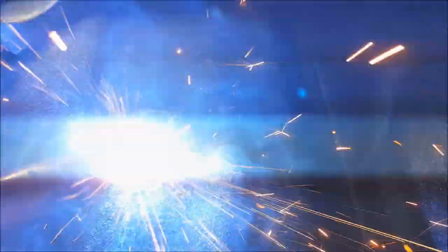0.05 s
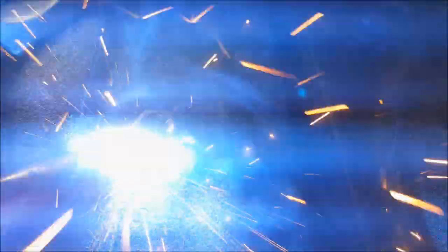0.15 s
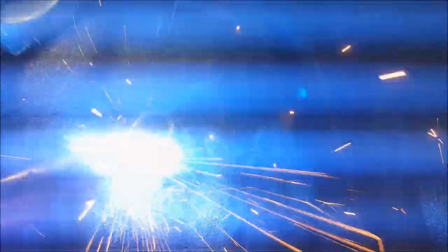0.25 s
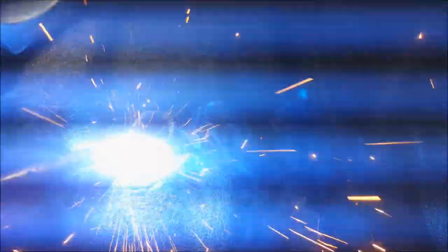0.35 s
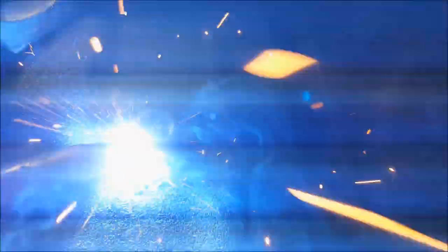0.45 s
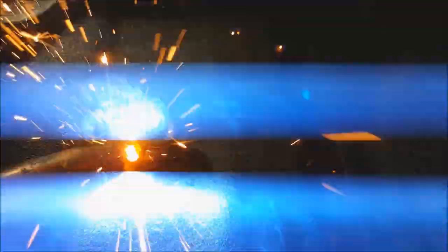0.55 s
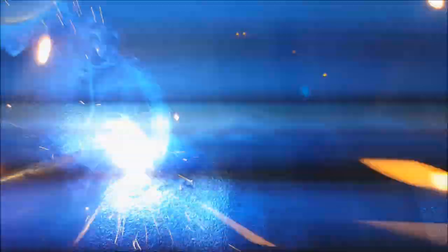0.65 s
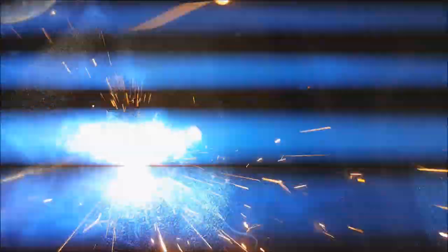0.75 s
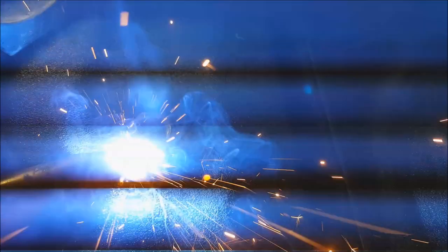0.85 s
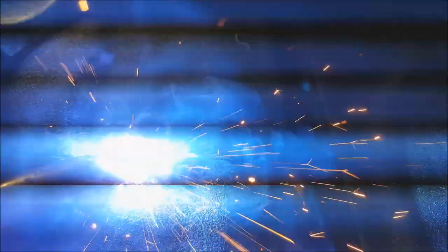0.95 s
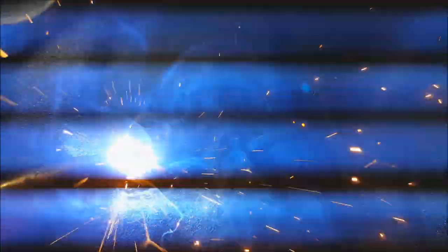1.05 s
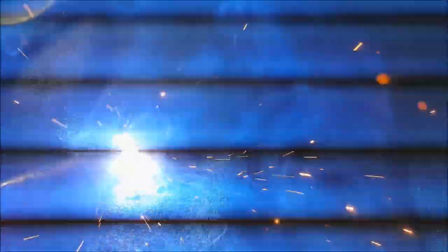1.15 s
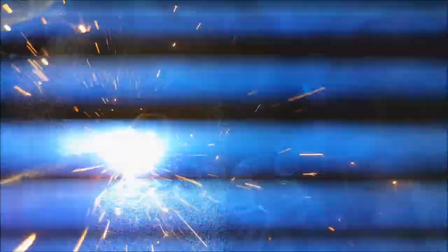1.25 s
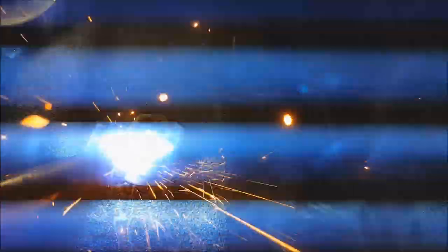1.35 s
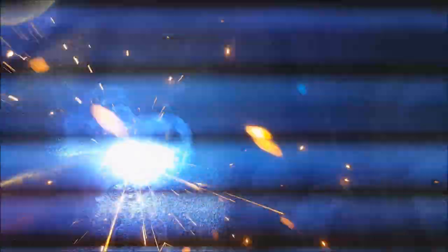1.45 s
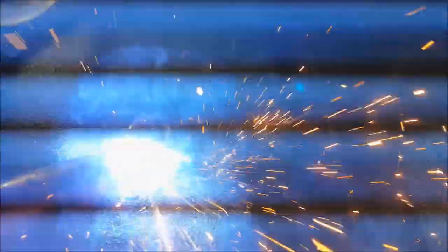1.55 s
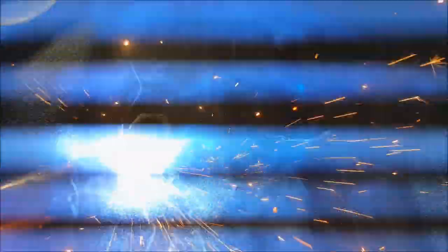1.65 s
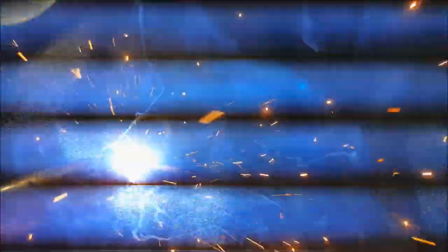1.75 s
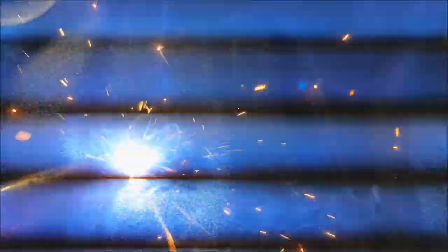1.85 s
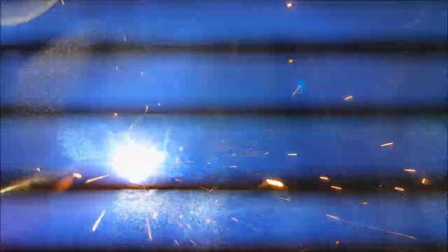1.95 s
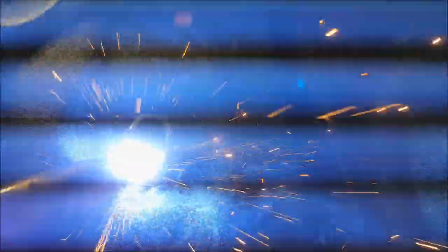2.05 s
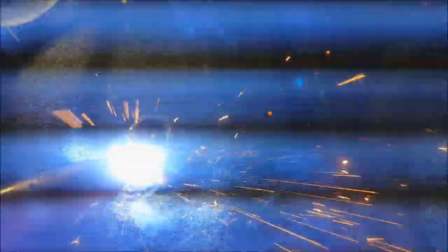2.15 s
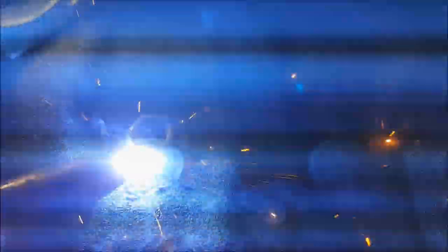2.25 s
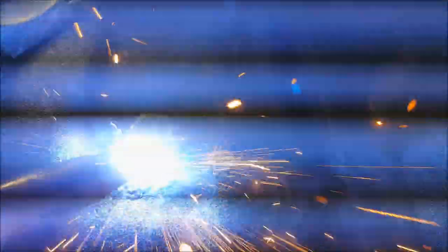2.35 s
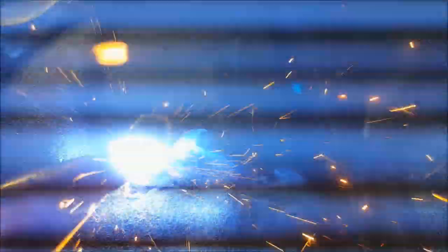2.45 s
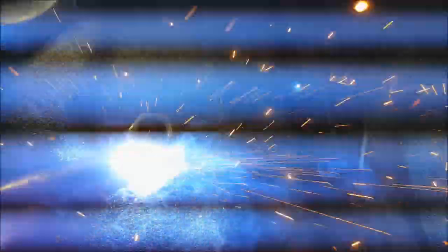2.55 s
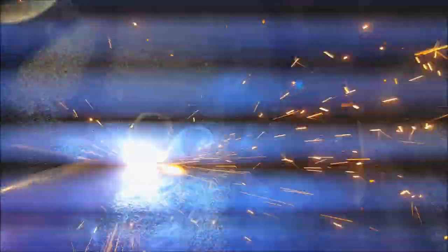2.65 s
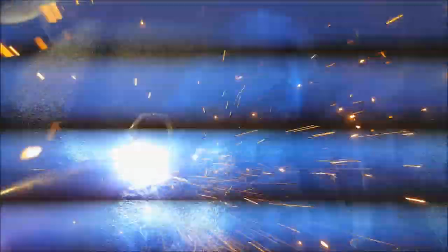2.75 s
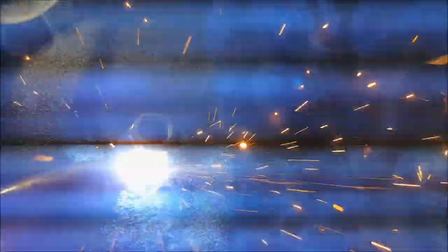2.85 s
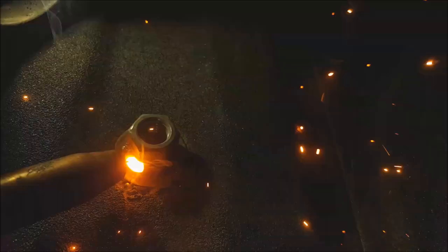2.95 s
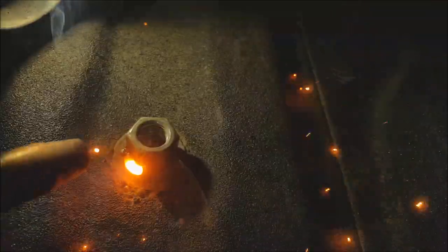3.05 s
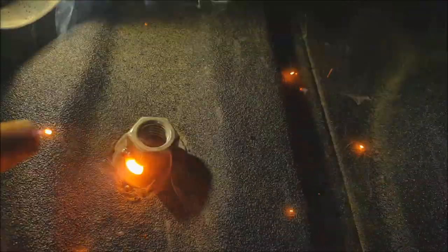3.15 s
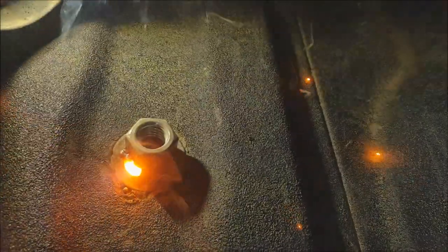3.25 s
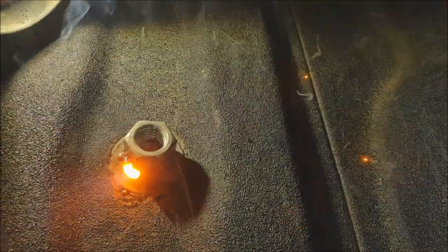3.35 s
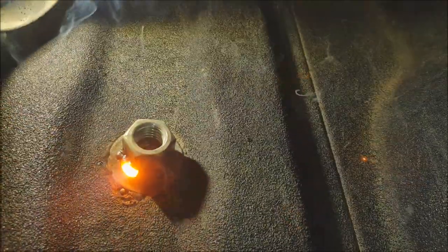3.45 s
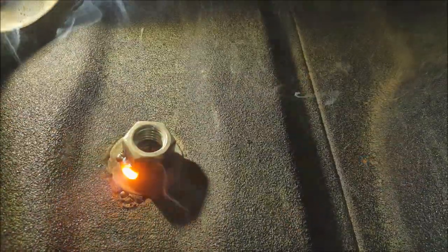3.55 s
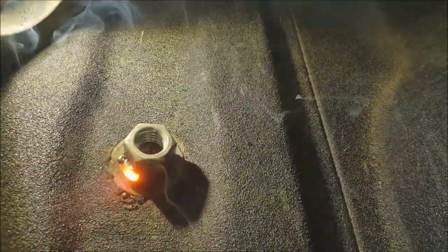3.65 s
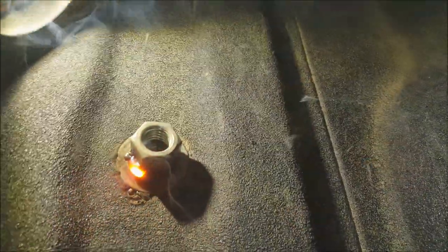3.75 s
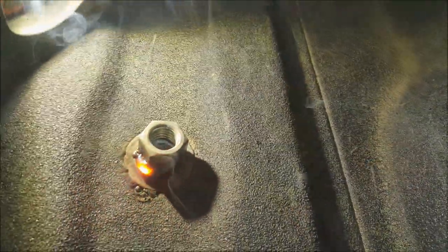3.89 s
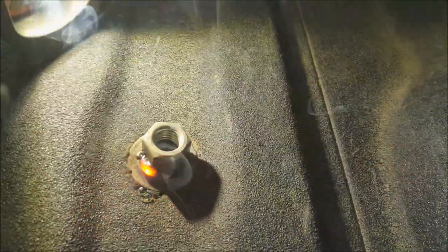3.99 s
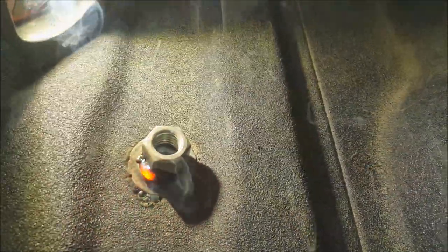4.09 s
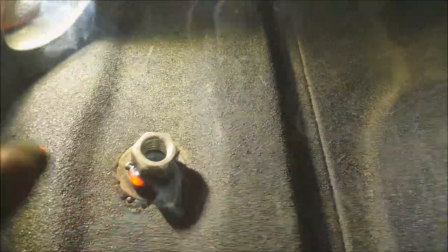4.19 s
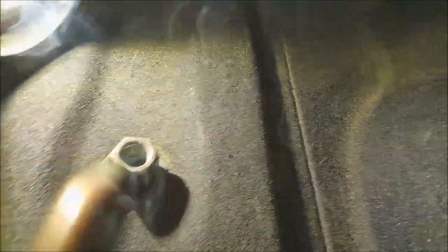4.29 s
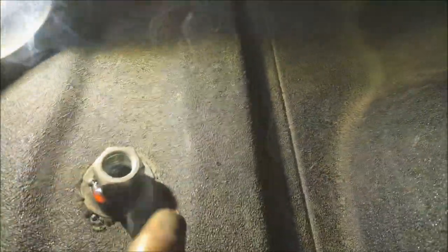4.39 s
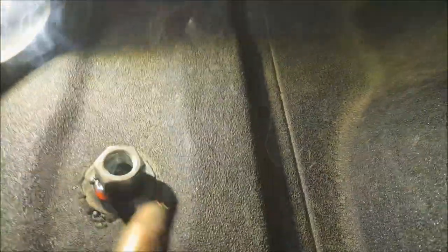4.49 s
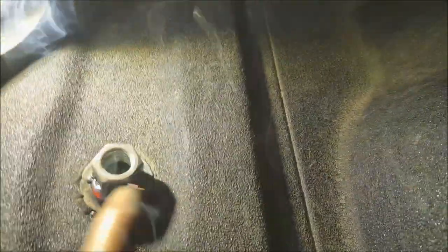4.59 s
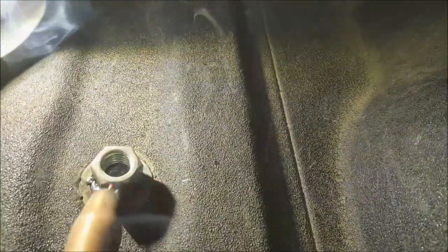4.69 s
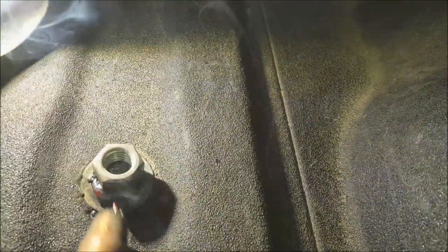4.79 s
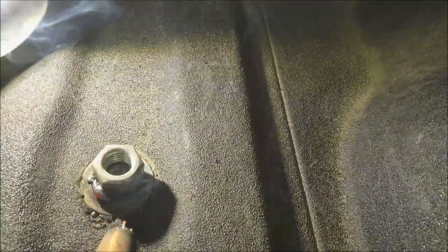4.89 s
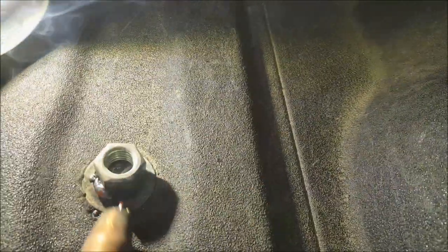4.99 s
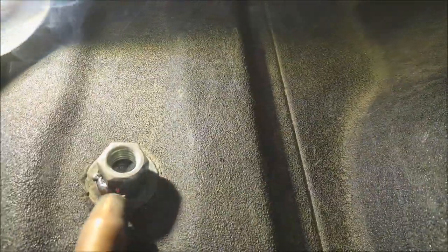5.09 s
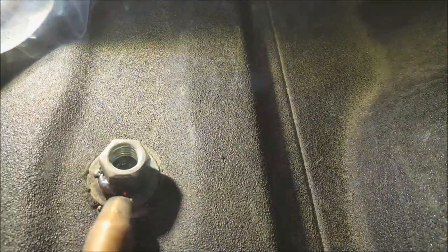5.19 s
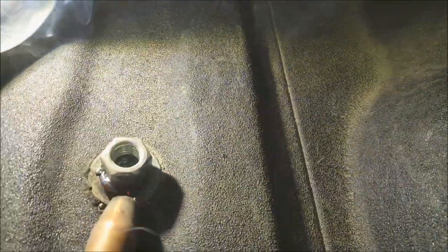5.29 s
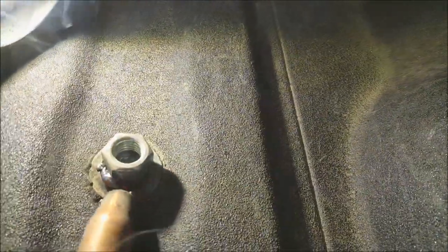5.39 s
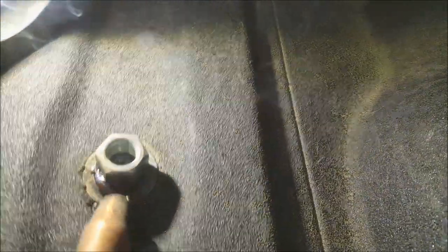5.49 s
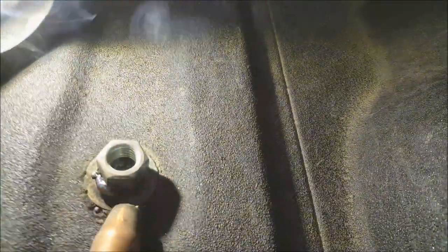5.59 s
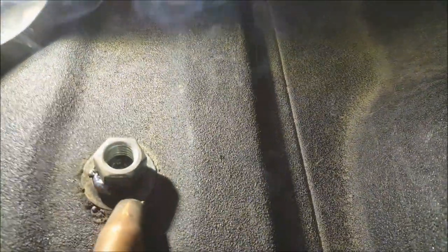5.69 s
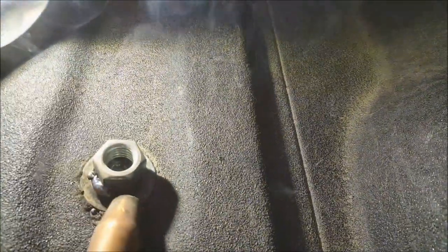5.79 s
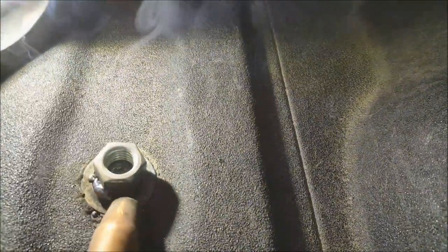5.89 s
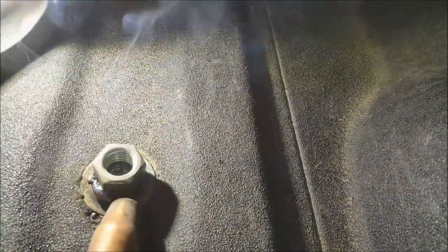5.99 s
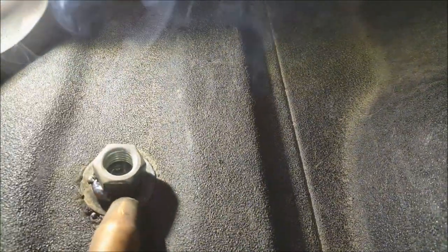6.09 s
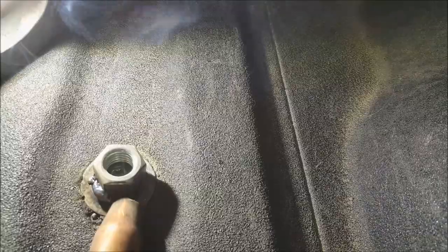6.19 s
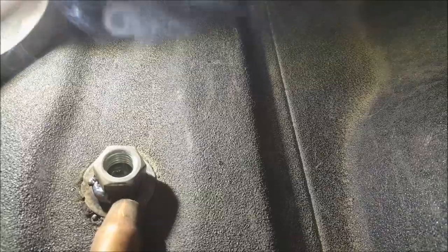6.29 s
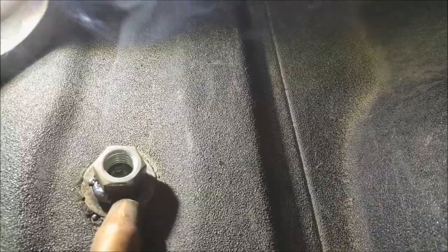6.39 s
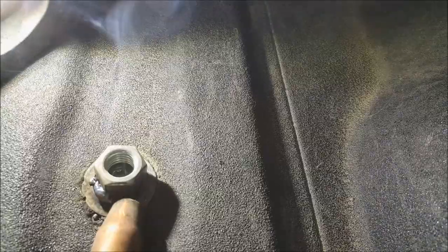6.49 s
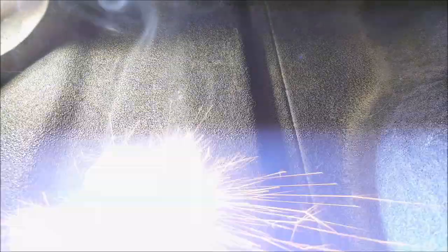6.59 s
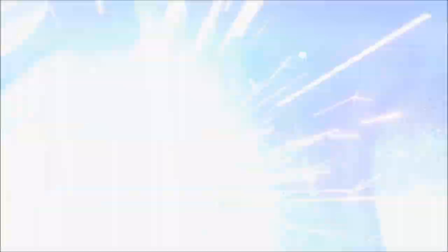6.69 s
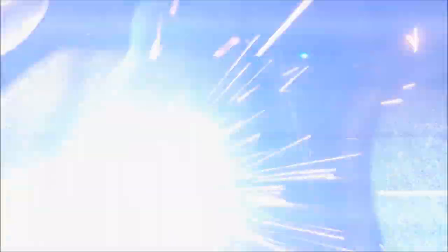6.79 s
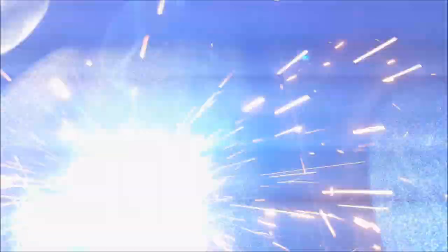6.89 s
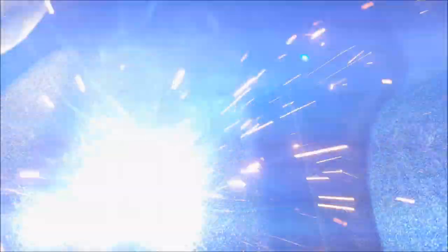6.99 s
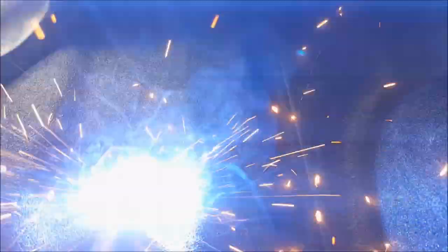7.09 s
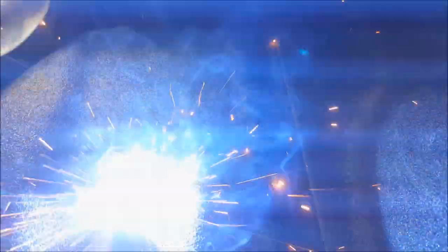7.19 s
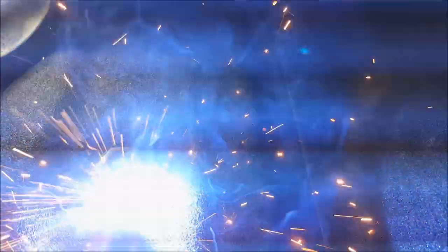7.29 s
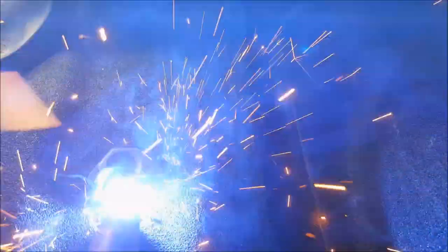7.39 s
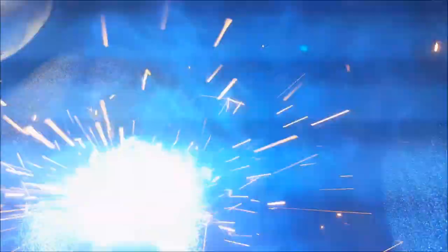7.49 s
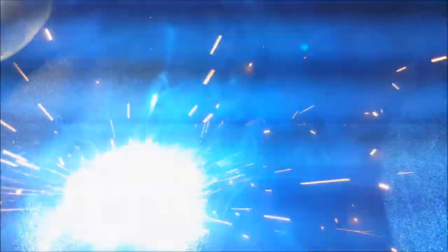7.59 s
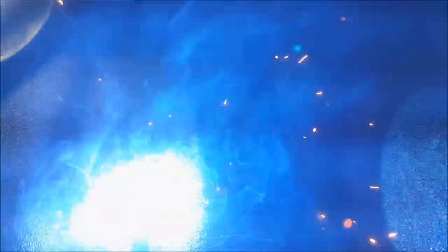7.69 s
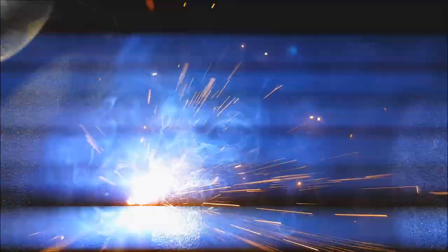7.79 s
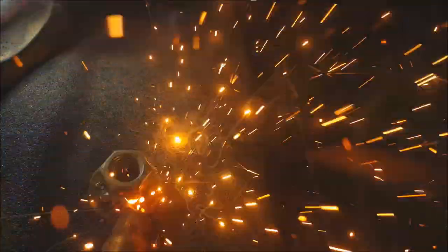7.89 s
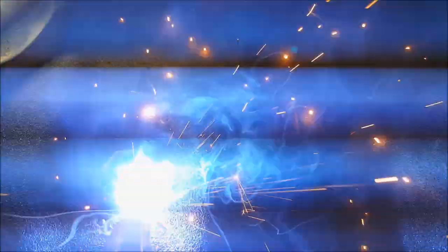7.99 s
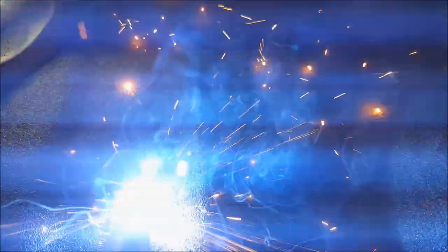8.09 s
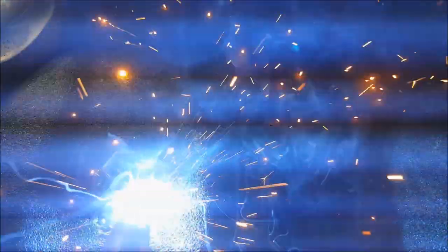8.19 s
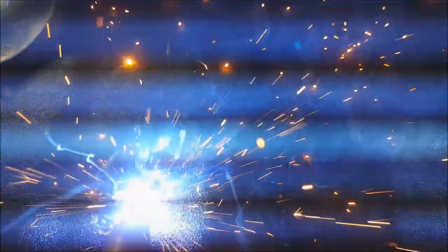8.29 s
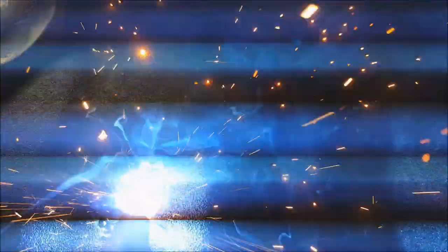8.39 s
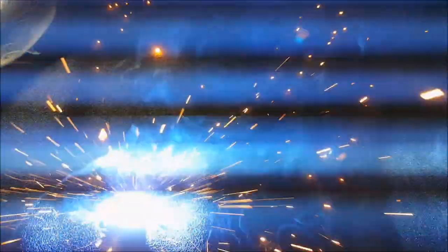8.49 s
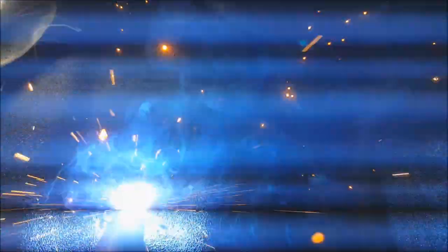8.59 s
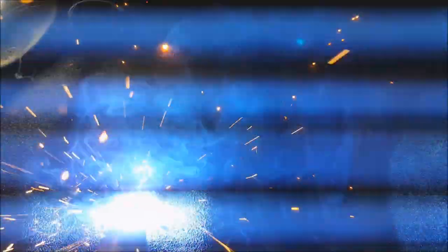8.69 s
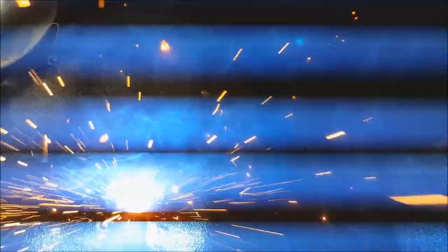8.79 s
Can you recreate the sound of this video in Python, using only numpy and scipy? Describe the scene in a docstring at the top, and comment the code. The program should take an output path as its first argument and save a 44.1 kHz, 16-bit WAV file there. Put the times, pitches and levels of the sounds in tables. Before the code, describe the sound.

Close, buzzing crackle of a welding arc stops for a few seconds of steady hum and ticks on steel, then stutters back.

```python
"""A wire-feed arc welder on a rusted bolt in a workshop, stereo microphone close to the work.
For three seconds the arc re-strikes on every half wave of the mains: a crack, a duller puff of hot gas,
a steady sizzle under both. In the pause the transformer's hum and a fan's rumble come up, the torch taps
the steel and is moved with a faint rustle, and the wire shorts once. From about 6.6 s a second weld
stutters between short circuits and burning arc, and the workshop drops back behind it."""
import sys
import numpy as np
from scipy import signal
from scipy.fft import rfft, irfft
from scipy.io import wavfile
from scipy.ndimage import uniform_filter1d

SR = 44100
rng = np.random.default_rng(int(sys.argv[2]) if len(sys.argv) > 2 else 0)


def wav_record(signal):
    """Record a signal, one row per channel, as 16-bit PCM in the file named by sys.argv[1]."""
    frames = np.transpose(np.atleast_2d(signal))
    bounded = np.clip(frames, -1, 1)
    # unit amplitude maps onto the largest positive 16-bit level
    quanta = np.round(bounded * 32767).astype(np.int16)
    wavfile.write(sys.argv[1], SR, quanta)


N = 390285
RIPPLE_HZ = 120  # half waves of the mains
# spectrum of rushing hot gas: f/Hz, level/dB
GAS_SPECTRUM = [(12, -40.5), (20, -23), (70, -13), (305, -6), (361, 2), (445, -2), (1740, -7), (2430, -9.5),
                (3000, -17), (3900, -42.5), (6600, -120)]


def undb(db):
    return 10 ** (np.asarray(db) / 20)


def level(x, db):
    """Scale to an rms level."""
    return x * undb(db) / np.sqrt(np.mean(x ** 2))


def colour(x, points):
    """Causal filter through (f/Hz, gain/dB) points, from the folded cepstrum."""
    hz, db = np.transpose(points)
    size = 2 ** 13
    gain_db = np.interp(np.log(np.arange(size // 2 + 1) * SR / size + 1), np.log(hz), db)
    cep = irfft(gain_db * np.log(10) / 20)
    cep[1:size // 2] *= 2
    cep[size // 2 + 1:] = 0
    return signal.fftconvolve(x, irfft(np.exp(rfft(cep)))[None], axes=1)[:, :N]


def tint(x, points):
    """Colour white noise and keep its power."""
    return colour(x, points) / np.linalg.norm(colour(np.eye(1, N), points))


def walk(rate):
    """Random levels held 1 / rate s and slewed; spread near 1."""
    k = int(SR / rate)
    return uniform_filter1d(np.repeat(rng.standard_normal(N // k + 1), k), k)[:N]


def add(track, s, shape):
    """Mix a short shape into a track at s seconds."""
    i = int(max(s, 0) * SR)
    track[..., i:i + shape.shape[-1]] += shape[..., :N - i]


def blast(length_ms, rise_ms):
    """Envelope that rises and dies away exponentially, peak 1."""
    ms = np.arange(SR // 20) * 1000 / SR
    shape = (1 - np.exp(-ms / rise_ms)) * np.exp(-ms / length_ms)
    return shape / shape.max()


def echoes(x, t60_s, start_ms):
    """Each channel through its own decaying scatter of reflections."""
    t = np.arange(SR // 2) / SR
    tail = rng.standard_normal((2, len(t))) * 1000. ** (-t / t60_s) * (t > start_ms / 1000)
    return signal.fftconvolve(x, tail / np.linalg.norm(tail, axis=1, keepdims=True), axes=1)[:, :N]


def workshop():
    """Room tone: the fan's rumble and wavering blade tone, the transformer's hum and thin overtones."""
    # fan noise: f/Hz, level/dB
    fan_spectrum = [(15, -39), (28, -35.5), (55, -18), (95, -7), (110, -8), (140, -2), (185, -6.5),
                    (212, -19.5), (520, -22), (1050, -29), (1380, -33.5), (1700, -31), (3500, -43),
                    (8300, -51), (10000, -58.5), (15000, -50.5)]
    # transformer overtones, runs of multiples of the ripple: first, last, relative level/dB
    overtones = [(14, 14, -33), (25, 25, -32), (28, 28, -34), (34, 34, -38), (38, 39, -41), (40, 42, -36),
                 (43, 48, -40), (49, 52, -36), (53, 53, -43), (68, 68, -37)]
    # room tone, low under and just after the arc: t/s, gain/dB
    swell = [(0, -55.5), (3.099, -61), (3.705, -58.5), (3.725, -48.5), (4.1, -44.5), (4.699, -43.5),
             (6.68, -43.5), (6.75, -69), (7.85, -58), (8.85, -55)]
    t = np.arange(N) / SR
    mid, side = colour(rng.standard_normal((2, N)), fan_spectrum)
    side = colour(side[None], [(150, -20), (300, -10.5), (700, -1), (1400, 3.5), (4000, 0)])[0]
    rumble = level(mid + side * np.array([[1], [-1]]), -2.2) * undb(.76 * walk(5))
    blade = undb(-2.5 + 2 * walk(10)) * np.sin(2 * np.pi * np.cumsum(165 + 3 * walk(8.5)) / SR)
    hum = undb(4 + 2.9 * walk(4.4)) * np.sin(2 * np.pi * RIPPLE_HZ * t)
    tones = [(1007, -30)]  # a thin whine off the series: f/Hz, relative level/dB
    tones += [(k * RIPPLE_HZ, db + 1.5 * rng.standard_normal())
              for first, last, db in overtones for k in range(first, last + 1)]
    phases = rng.uniform(0, 2 * np.pi, (len(tones), 2, 1))
    buzz = sum(undb(db + 2.2 * walk(8.6)) * np.sin(2 * np.pi * hz * t + phase)
               for (hz, db), phase in zip(tones, phases))
    lean_left = undb([[.6], [-.6]])
    return undb(np.interp(t, *np.transpose(swell))) * lean_left * (rumble + blade + hum + buzz)


def torch_rustle():
    """The torch is moved: faint, flickering treble noise, unrelated between the sides."""
    # course of the rustle: t/s, level/dB
    course = [(4.24, -84), (4.31, -63), (4.38, -69), (4.47, -66), (4.55, -94)]
    noise = colour(rng.standard_normal((2, N)), [(1500, -19.5), (4000, -2), (8000, -7.5), (10000, -23.5)])
    return level(noise, 0) * undb(np.interp(np.arange(N) / SR, *np.transpose(course)) + 3 * walk(40))


def steel_taps():
    """Torch and cooling slag tick on the steel: each tick clacks, rings its modes and thuds the bench."""
    # ticks: t/s, clack level/dB, clack centre f/Hz, ring gain/dB, thud gain/dB
    ticks = [(3.5874, -65, 2800, -76, -58), (3.715, -26.5, 2510, -40.5, -62), (4.647, -48, 3500, -67, -48),
             (4.6554, -54, 3500, -64, -53), (4.778, -42, 1900, -51, -33.5), (5.194, -30, 600, -56, -31),
             (5.197, -34, 2670, -49.5, -49), (5.213, -45, 4000, -52, -44), (5.256, -33, 470, -75, -37)]
    # modes of the steel: f/Hz, relative level/dB, t60/s
    modes = [(1680, -1, 0.071), (1870, -17, 0.069), (2880, 5, 0.035), (3025, 1, 0.07), (4130, -7, 0.074),
             (5500, -9, .06)]
    thud_hz, thud_t60_s, clack_t60_s = 91, .2, .062
    t = np.arange(SR // 4) / SR
    thud_attack = np.sin(np.pi * np.minimum(t / .014, .5))
    thud = np.sin(2 * np.pi * thud_hz * t) * thud_attack * 1000. ** (-t / thud_t60_s)
    out = np.zeros((2, N))
    spreads_db = 3 * rng.standard_normal((len(ticks), 2, len(modes)))
    for (s, clack_db, clack_hz, ring_db, thud_db), spread_db in zip(ticks, spreads_db):
        ring = sum(undb(db + spread_db[:, [m]]) * np.sin(2 * np.pi * hz * t) * 1000. ** (-t / t60)
                   for m, (hz, db, t60) in enumerate(modes))
        band = np.array([(.3, -14), (1, 0), (2.2, -6), (3.5, -25), (9, -60)]) * [clack_hz, 1]
        clack = colour(rng.standard_normal((2, len(t))) * 1000. ** (-t / clack_t60_s), band)[:, :len(t)]
        add(out, s, undb(clack_db) * clack / np.abs(clack).max() + undb(ring_db) * ring + undb(thud_db) * thud)
    return out + undb(-15) * echoes(out, t60_s=.18, start_ms=13)


def transformer_growl(envelope):
    """A short circuit loads the transformer: a low band of noise, dead centre."""
    noise = colour(rng.standard_normal((1, N)), [(80, -40), (150, 1), (260, -34)])
    return uniform_filter1d(envelope, size=600) * level(noise, 0)


def bolt_ring(x, modes):
    """Narrow resonances of bolt and plate, every other one in opposite phase between the sides."""
    return sum(undb(db) * np.array([[1], [(-1) ** k]])
               * signal.lfilter(*signal.iirpeak(hz, hz / width, SR), x)
               for k, (hz, width, db) in enumerate(modes))


def steel_scatter(stereo):
    """Short paths off bolt and plate, as all-pass chains: they smear a click without colouring it."""
    # paths to the left, then the right side: three delays/samples
    paths = [(5, 19, 43), (11, 29, 37)]
    sides = []
    for x, lags in zip(stereo, paths):
        for lag in lags:
            taps = np.r_[.3, np.zeros(lag - 1), 1]
            x = signal.lfilter(taps, taps[::-1], x)
        sides.append(x)
    return np.array(sides)


def ripple_strikes(bubble_hz):
    """One strike each half wave: returns the crack's envelope and the stereo gas pops."""
    count = int(N / SR * RIPPLE_HZ)
    # the strikes stay fairly even in timing, size, length and pitch
    late, size, length, pitch = np.tanh(.8 * rng.standard_normal((count, 4))).T
    kick_sign, kick_lag = rng.choice([-1, 1], (count, 2)), rng.random((count, 2))
    polarity = rng.choice([-1, 1], count)
    drift, stretch, wander, facing = walk(9), walk(4), walk(12), np.sign(walk(45))
    crack, pops = np.zeros(N), np.zeros((2, N))
    for k in range(count):
        i = int(k * SR / RIPPLE_HZ)
        s = (k + .08 + .11 * late[k] + .16 * drift[i]) / RIPPLE_HZ
        ms = .7 * np.exp(.55 * length[k] + .12 * stretch[i])
        add(crack, s, undb(1.1 * size[k]) * blast(ms, rise_ms=.0077))
        # a gas bubble bursts: one quickly damped swing at the pitch its size gives
        cycles = np.arange(SR // 100) / SR * bubble_hz[i] * np.exp(.53 * pitch[k])
        pop = np.sin(2 * np.pi * cycles + .87) * np.exp(-cycles / .43)
        pop *= polarity[k] * undb(2.5 * size[k]) / np.linalg.norm(pop)
        # the arc wanders round the bolt, so runs of pops share their lag and polarity between the sides
        add(pops[0], s + .00034, pop)
        add(pops[1], s + .00031 + .0003 * wander[i], facing[i] * pop)
        for c in range(2):  # a weaker kick follows on each side
            add(pops[c], s + .0006 + .0015 * ms * kick_lag[k, c], kick_sign[k, c] * min(.35 * ms, 1) * pop)
    # tone of the pops: f/Hz, gain/dB
    pop_tilt = [(20, -32.5), (70, -7.5), (300, -4), (450, -0.5), (900, -2), (1500, 0), (2600, 3.5),
                (3600, 0), (6500, -35.5)]
    sizzle = undb(1.6 * walk(60))
    rush = level(colour(sizzle * rng.standard_normal((2, N)), GAS_SPECTRUM), -9)
    return level(crack + .24 * sizzle, 0), level(level(colour(pops, pop_tilt), 0) + rush, 2.6)


def burning_arc(t, second_weld):
    """The arc burns in stretches, surging and blinking: returns the crack's envelope and the gas sound."""
    # gas puffs, one curve for each stretch of burning arc: t/s, gain/dB
    burns = [
        [(0.0, -32), (0.274, -27), (0.346, -35), (0.354, -28), (0.688, -29), (0.69, -38)],
        [(0.76, -30.5), (0.82, -23), (0.83, -17), (0.88, -31), (0.92, -22), (0.94, -29), (1.14, -32.5),
         (1.24, -24), (1.26, -32.5), (1.45, -27.5), (1.5, -21), (1.58, -31), (1.6, -21.5), (1.68, -31),
         (1.77, -29.5), (1.79, -26), (2.31, -28.5), (2.37, -33), (2.41, -24.5), (2.48, -29), (2.67, -23),
         (2.69, -32), (2.7, -25.5), (3.01, -28), (3.02, -42)],
        [(6.772, -23.5), (6.828, -22), (6.842, -38.5), (6.862, -22.5), (6.992, -29.5), (7.012, -19.5),
         (7.084, -32.5), (7.09, -25), (7.434, -24.5)],
        [(7.578, -26), (7.686, -28), (7.745, -26.5)],
        [(7.928, -26.5), (7.938, -18.5), (7.985, -23.5)],
        [(8.13, -27.5), (8.314, -22.5), (8.33, -28.5), (8.42, -21.5), (8.426, -29.5), (8.644, -23.5),
         (8.65, -28.5), (8.782, -27.5), (8.85, -33)],
    ]
    # the arc blinks out for a cycle or two: re-strike t/s, length/s, depth/dB
    blinks = [(.027, 0.011, -9), (.57, .016, -10), (.667, .012, -10), (1.476, .012, -11), (2.337, .01, -9),
              (2.352, .01, -7.5), (2.365, .008, -7.5), (2.425, .006, -8.5), (7.09, .008, -8),
              (8.46, 0.0096, -4), (8.815, 0.011, -6)]
    # runs of smaller bubbles rasp higher: middle t/s, length/s
    rasps = [(0.984, 0.054), (1.665, .04), (1.739, .06), (2.126, 0.075), (2.168, 0.027), (2.272, 0.064),
             (2.757, 0.062), (6.913, .06), (7.203, 0.065), (8.364, 0.036), (8.653, 0.022)]
    usual_gas_db, rasp_db, rasp_octaves = -28, 1, 1.1
    gas_db = np.interp(t, *np.vstack(burns).T)
    surge_db = gas_db - usual_gas_db
    rasp = sum(np.exp(-(2 * (t - s) / length) ** 2) for s, length in rasps)
    bubble_hz = 736 * 2 ** (rasp_octaves * rasp - surge_db / 16.5)  # bigger bubbles are louder and lower
    cracks, pops = ripple_strikes(bubble_hz)
    lit = sum((t >= rows[0][0]) & (t <= rows[-1][0]) for rows in burns)
    lit = lit * undb(sum(db * ((t >= s - length) & (t < s)) for s, length, db in blinks))
    crack_db = np.where(second_weld, -23, -22.75 - .5 * t)  # sags through the first weld
    crack_db += .15 * surge_db + .6 * walk(14)
    return lit * cracks * undb(crack_db), lit * pops * undb(gas_db + rasp_db * rasp)


def stutter(t):
    """The arc strikes singly or the wire fries in a short circuit: envelopes of crack, puff and growl."""
    # lone strikes: t/s, crack gain/dB, puff against crack/dB, length/ms
    strikes = [(0.028, -13, -2, 1.0), (.668, -17, -3, 1.5), (.570, -11, -4.5, 1.2),
               (0.7426, -14, -1.5, 6.9), (0.894, -16, 0, 0.5), (1.476, -21, -12, 1.3),
               (2.338, -15, -3, 1.2), (2.353, -18, -4, 1.2), (2.366, -18, -4, 1.2),
               (4.737, -13, -2.5, 0.23), (4.7704, -41, 4, 2.1), (6.6072, -34.5, -24, 4),
               (6.6914, -2, 1, 2.45), (6.7074, -19, -19, 3.9), (6.76, -8.5, 1, 3.2),
               (7.4507, -17, -2.5, 1.5), (7.4853, -17, -6, 3.2), (7.56, -15, -18, 2.9),
               (7.7723, -18, 1, 2.4), (7.906, -29, -16, 2.8), (7.929, -14, -11, 4), (8.0089, -10, -1, 2.7),
               (8.1015, -16, -6, 1.9), (8.134, -19, -1, 0.94), (8.461, -17, 7.5, 0.76),
               (8.815, -20, 2, 0.71)]
    # short circuits: start t/s, end t/s, start gain/dB, end gain/dB, growl level/dB
    shorts = [(0.702, 0.741, -49, -33, -60), (4.728, 4.771, -50, -40, -55), (6.627, 6.68, -37, -30, -28.5),
              (6.707, 6.761, -24.5, -32, -32.5), (7.477, 7.504, -38, -31, -56),
              (7.536, 7.581, -43, -25, -47), (7.748, 7.775, -42, -28, -60), (7.79, 7.86, -41, -53, -52),
              (7.908, 7.927, -47, -36, -39), (8.01, 8.02, -37, -41, -32), (8.099, 8.126, -55, -27, -37)]
    crack, puff, growl = np.zeros((3, N))
    for s, db, puff_db, ms in strikes:
        add(crack, s, undb(db) * blast(ms, rise_ms=.025))
        add(puff, s, undb(db + puff_db) * blast(ms, rise_ms=.48))
    for start, end, start_db, end_db, growl_db in shorts:
        on = (t >= start) & (t <= end)
        frying = on * undb(np.interp(t, [start, end], [start_db, end_db]))
        crack += frying
        puff += undb(-12) * frying
        growl += on * undb(growl_db)
    return crack, puff, growl


def crackle(envelope, second_weld):
    """Droplets burst in tiny sparks: a grainy noise with a few samples far out, which rings the bolt."""
    # crackle of the first, then the second weld: f/Hz, level/dB
    spectra = [
        [(700, -20.5), (1500, -13), (2440, -10), (3500, -7.5), (4680, -12), (5060, -7.5), (6150, -11.5),
         (7380, -2), (9090, -16.5), (10200, -21), (12600, -14.5), (15700, -15.5)],
        [(700, -22), (1500, -8), (2170, -9), (3290, -6), (5470, -8.5), (6480, -4), (9570, -18.5), (10800, -20),
         (12300, -15), (15700, -14)],
    ]
    # modes of bolt and plate, first, then second weld: f/Hz, width/Hz, gain/dB
    bolt_modes = [
        [(5080, 90, -3), (5920, 120, -8), (6500, 94, -6), (7150, 150, -3), (7580, 70, 3), (7850, 66, -6)],
        [(4310, 80, -4), (5100, 80, -6), (5760, 80, -6), (6470, 110, 0), (6650, 110, -2), (7460, 60, -7)],
    ]
    sparks = envelope * level(undb(2.6 * np.minimum(rng.exponential(size=N), 5.5)), 0)
    noise = rng.standard_normal((3, N))  # common, left, right
    lag = np.round(8 + 3 * walk(3)).astype(int)  # the path to the right side drifts
    common = np.array([noise[0], noise[0, np.clip(np.arange(N) - lag, 0, N - 1)]])
    treble = steel_scatter(sparks * (np.sqrt(.6) * common + np.sqrt(.4) * noise[1:]))
    return sum(undb(2.5) * bolt_ring(weld * sparks * noise[0], modes) + tint(weld * treble, spectrum)
               for weld, spectrum, modes in zip((~second_weld, second_weld), spectra, bolt_modes))


def welder():
    """Crackle and gas right at the microphone; near reflections and, faintly, the walls answer."""
    # the arc's place in the stereo image: f/Hz, left minus right/dB
    lean = [(300, -0.2), (3000, 0.5), (5500, -1), (7000, -3), (8300, 4), (12000, -0.4)]
    t = np.arange(N) / SR
    second_weld = t > 6
    burn_crack, gas = burning_arc(t, second_weld)
    stutter_crack, puff, load = stutter(t)
    direct = gas + crackle(burn_crack + stutter_crack, second_weld)
    direct += tint(puff * rng.standard_normal((2, N)), GAS_SPECTRUM)
    direct = np.vstack([colour(direct[[c]], [(hz, db * (.5 - c)) for hz, db in lean]) for c in range(2)])
    growl = transformer_growl(load)
    walls = echoes(direct, t60_s=.6, start_ms=8.7)
    walls = colour(walls, [(200, -8.5), (1500, -5.5), (6000, -1), (12000, -11)])
    near = echoes(direct, t60_s=.07, start_ms=3)
    return undb(2.5) * (direct + undb(-9) * near + undb(-22.5) * walls) + growl


def scene():
    return welder() + steel_taps() + torch_rustle() + workshop()


def record(dry):
    """The loudest strikes clip; a steep low-pass cuts the top."""
    return signal.sosfilt(signal.ellip(14, .2, 80, 15740, fs=SR, output="sos"), np.clip(dry, -.95, .95))


dry = scene()
out = record(dry)
wav_record(out)
```